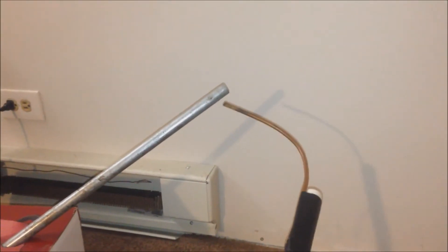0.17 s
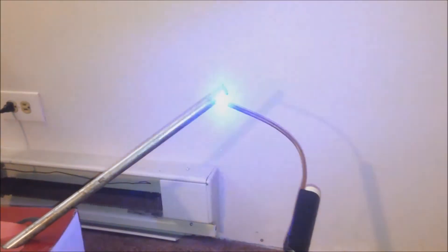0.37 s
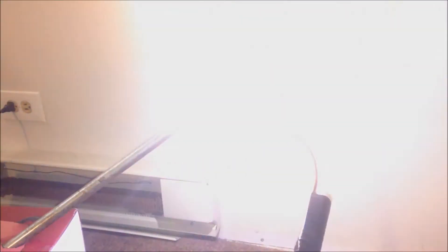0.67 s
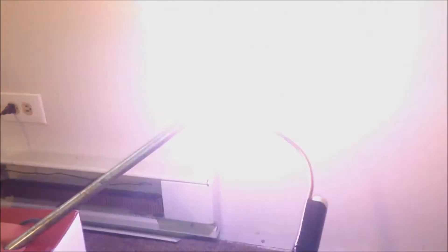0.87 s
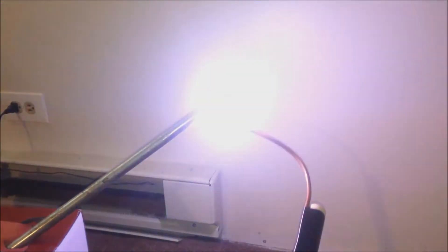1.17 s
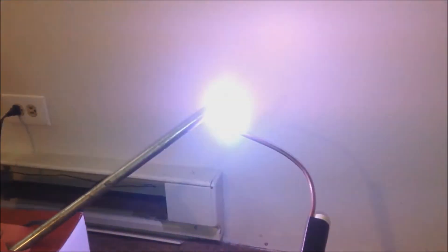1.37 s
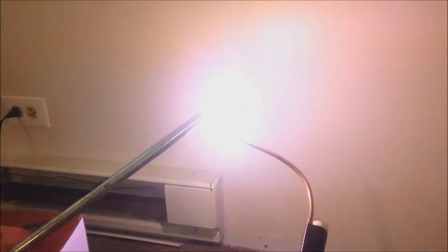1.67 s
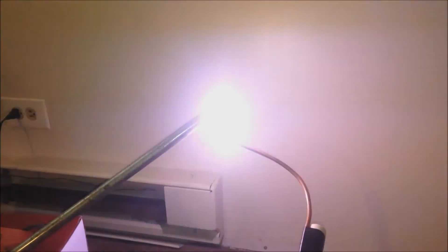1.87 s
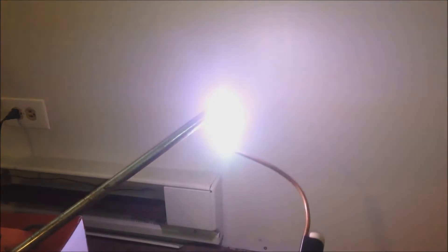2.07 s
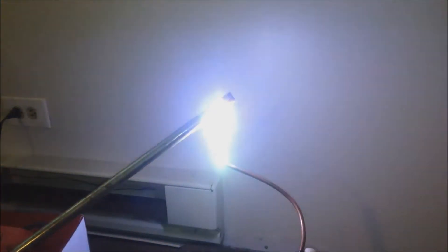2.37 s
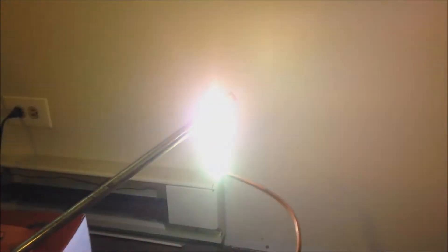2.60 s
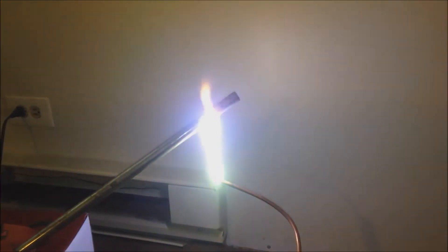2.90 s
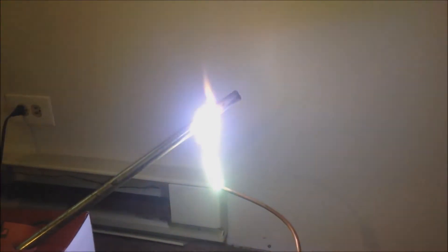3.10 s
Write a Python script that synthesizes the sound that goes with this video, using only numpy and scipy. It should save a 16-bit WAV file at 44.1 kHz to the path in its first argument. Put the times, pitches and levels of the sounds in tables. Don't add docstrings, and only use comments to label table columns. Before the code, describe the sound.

A high-voltage electric arc buzzes in a small room. Quiet room air and a faint chirping whirr come first; at 0.37 s a rod ticks against wire with a short dull ring. From 0.44 s sparks sizzle, then at about 0.74 s a low thump brings a loud, raspy 120-per-second buzz. Sharp snaps cluster until 2.3 s, with more near 2.7; buzz, hiss and hum thicken until the abrupt end around 3.2 s.

```python
import sys
import numpy as np
from scipy import signal
from scipy.fft import rfft, irfft
from scipy.io import wavfile
from scipy.ndimage import uniform_filter1d

SR = 44100
rng = np.random.default_rng(int(sys.argv[2]) if len(sys.argv) > 2 else 0)


def linear_from_db(decibels):
    return 10 ** (np.asarray(decibels, float) / 20)


def materialize(psi):
    bounded = np.clip(np.atleast_2d(psi).T, -1, 1)
    quanta = np.round(bounded * 32767).astype(np.int16)
    wavfile.write(sys.argv[1], SR, quanta)


N = 143325
t = np.arange(N) / SR
MAINS_HZ = 60
START_S, STRIKE_S = 0.44, 0.00425
CLIMB_FROM_S, CLIMB_TO_S = 1.4, 3.23
SNAP_LAG_S, SNAP_DB = 0.001, 6.5
TAP_S, BRUSH_S, LIFT_S = 0.369, 0.33, 0.398
THUMP_S, THUMP_HZ, THUMP_MS = 0.737, 116, 8

# t/s, level/dB, width/ms, unrest/dB
ARC_GROWTH = [(.44, -53, 0.048, -3), (.55, -29.5, 0.012, -21), (.66, -25.5, 0.084, -5.5),
              (.76, -18, 0.079, -14.5), (.93, -16.5, 0.082, -4), (1.0, -21, 0.097, -11.5),
              (1.45, -18.5, 0.13, -26.5), (1.57, -16.5, 0.15, -12.5), (1.7, -17, 0.18, -17.5),
              (1.8, -17, 0.16, -8.5), (1.9, -16.5, 0.17, -24.5), (2.12, -16.5, 0.17, -7),
              (2.18, -15, 0.18, -18.5), (2.28, -14, 0.21, -11.5), (2.45, -17.5, 0.2, -17.5),
              (2.72, -15, 0.19, -11), (2.85, -18, 0.21, -16.5), (3.25, -17.5, 0.23, -19)]
# t/s, extra level/dB, bite/dB
SURGES = [(0.504, 0, -0.6), (0.571, 3.5, -10), (0.687, 1.5, 1.5), (0.721, 2.9, -14), (0.754, 3, -6),
          (0.779, 4, 5.5), (0.937, -3, -1), (1.104, 5, 2), (1.196, 3.5, 11), (1.204, 4.5, 5),
          (1.271, 4, -7), (1.287, 4.5, -1), (1.304, 7, 4), (1.354, 7.5, 10), (1.371, 2.6, -4),
          (1.537, 5.5, 2), (1.637, 2, 2), (1.646, 1, 5), (1.654, 0.5, -1.5), (1.712, -0.5, 4),
          (1.762, 3.9, 2), (1.812, 0, 4.1), (1.887, 5, 2.5), (1.979, -0.5, 17), (2.004, 1.5, 9),
          (2.046, 3.5, 8.5), (2.121, 5.5, 4.7), (2.129, 1, 1), (2.137, 4, 7), (2.146, 0.5, 6),
          (2.246, -2.5, 11), (2.254, 2.3, 7.5), (2.287, 2.5, 9), (2.321, -1.2, 7.5), (2.329, 2, 4.4),
          (2.387, 0.5, 6), (2.404, 4, -1), (2.512, 0, 2.5), (2.546, -2, 2.5), (2.562, -3.5, 4.5),
          (2.612, -2, 1), (2.629, 1.5, 7), (2.662, 2, -2), (2.771, -4, 7), (2.812, 1, -0.5),
          (2.887, 3.1, -0.5), (2.921, 1.5, -1), (2.937, -0.2, 7.7), (2.962, -1, 2), (3.037, 3.7, 5),
          (3.046, 2.5, 4), (3.054, 3.5, 2), (3.112, 0.5, 4), (3.121, 3.3, 3), (3.196, 1, 2),
          (3.204, 4.3, -0.5)]
# t/s, delay/ms, gain/1
WALL_ECHO = [
    (.44, 1.51, 0.29),
    (1.3, 1.596, 0.32),
    (1.9, 1.65, 0.36),
    (2.45, 1.67, 0.68),
    (3.0, 1.7, 0.83),
]
# f/Hz, width/Hz, gain arc low/1, gain arc high/1
STRIKE_BANDS = [(480, 100, -0.07, 0.32), (597, 81, 0.04, 0.45), (737, 90, -0.27, 0.43),
                (828, 85, -0.24, -0.53), (970, 80, .35, 0.046), (1220, 100, 0.61, 0.15),
                (1307, 120, 0.33, -0.57), (1565, 300, -0.39, -0.51), (1766, 145, 0.19, 0.93),
                (2050, 300, 0.02, -0.44)]
# t/s, peak level/dB, width/ms
SNAPS = [(0.703, -24.5, 0.057), (0.7691, -22.5, 0.063), (0.7868, -23.5, 0.036), (0.8191, -20, 0.025),
         (0.8371, -17.5, 0.016), (0.8689, -23, 0.062), (0.8865, -18, 0.025), (0.9033, -22.5, 0.062),
         (0.92, -23.5, 0.05), (0.9525, -22, 0.019), (0.97, -21, 0.058), (1.0865, -24.5, 0.068),
         (1.1867, -27, 0.034), (1.3368, -16.5, 0.043), (1.4045, -19, 0.031), (1.5035, -23, 0.097),
         (1.5534, -19, 0.073), (1.5868, -23, 0.075), (1.7534, -21.5, 0.091), (1.7707, -19, 0.045),
         (1.8033, -16, 0.044), (1.9702, -11.5, 0.026), (2.0203, -18, 0.041), (2.0368, -18, 0.066),
         (2.0713, -23, 0.064), (2.0873, -19.5, 0.04), (2.1034, -20, 0.051), (2.2703, -18, 0.044),
         (2.704, -19, 0.098), (2.7544, -13, 0.078)]
# t/s, level/dB
SIZZLE_LEVEL = [
    (0.42, -66),
    (0.476, -47.5),
    (0.528, -40),
    (0.732, -62.5),
    (0.738, -42),
    (0.75, -53),
    (0.894, -55),
    (1.1, -65),
]
# f/Hz, level per Hz/dB
SIZZLE_COLOUR = [(180, -36), (300, 2), (484, -8.5), (2100, -4.5), (2560, -37), (3230, -12), (15500, -1.5)]
# delay/ms, gain/1
REPEATS = [(2.7, -0.18), (3.35, 0.11), (4.9, -0.12), (6.0, 0.14), (7.9, -0.059)]
# f/Hz, width/Hz, gain/1
MICROPHONE = [(129, 40, 0.00061), (291.6, 620, -0.68), (590, 650, 0.32), (999, 170, 0.93),
              (1276, 310, 0.11), (1520, 300, 0.5), (1990, 470, 1), (2507, 790, -0.89), (3320, 194, 0.86)]
# f/Hz, level/dB, T60/s
ROD_MODES = [(107, -10, 0.3), (276, -7, 0.22), (344, -5.5, 0.15), (555, 1, 0.13), (915, -12, 0.064),
             (2500, -19.5, 0.061), (5330, -16, 0.044), (9850, -23, 0.14), (10400, -28.5, .1)]
# multiple of mains/1, level over the load/dB, phase/turns
HUM_PARTIALS = [(2, 1.9, 0.055), (3, -24.5, 0.23)]
# t/s, level/dB
CORE_LOAD = [
    (0.44, -64),
    (0.74, -43),
    (1.23, -44),
    (1.29, -40),
    (2.21, -36),
    (3.23, -33.5),
    (3.25, -31),
]
# f/Hz, level per Hz/dB
AIR_COLOUR = [(25, -28), (59, 0), (95, -16), (150, -14.5), (520, -13.5), (1050, -17), (2000, -29),
              (15500, -50)]
# f/Hz, level per Hz/dB
HISS_COLOUR = [(2500, 14), (3200, 10), (5600, 0), (10000, 0), (15500, 6)]


def arc():
    half_cycle = np.arange(int(START_S * 2 * MAINS_HZ), int(N / SR * 2 * MAINS_HZ))
    s = half_cycle / (2 * MAINS_HZ) + STRIKE_S
    odd = half_cycle % 2 == 1
    wander, flicker = rng.standard_normal((2, len(s)))
    at, extra_db, bite_db = np.array(SURGES).T
    struck = (at * 2 * MAINS_HZ).astype(int) - half_cycle[0]
    extra_db = np.bincount(struck, extra_db, len(s))
    bite_db = np.bincount(struck, bite_db, len(s))
    db = curve(ARC_GROWTH, 1, s) + extra_db
    width_ms = curve(ARC_GROWTH, 2, s) * linear_from_db(-0.33 * bite_db)
    unrest = curve(ARC_GROWTH, 3, s)
    outburst = np.minimum(rng.exponential(size=len(s)), 1.5)
    crackle_db = db + unrest + 5.6 * outburst - 1.2 * odd + 0.9 * bite_db

    even = even_strikes(s, odd, db, width_ms, wander)
    rough = crackle(s, crackle_db, width_ms, wander, flicker) + snaps()
    rough = rough + fizz(s, crackle_db) + roar(s, db, unrest, flicker)
    in_room = room(even, tail_db=-18.5) + room(rough, tail_db=-12)
    return in_room, sizzle(s, odd, wander) + snap_cracks()


def even_strikes(s, odd, db, width_ms, wander):
    jitter_s = 0.022 / 1000 * rng.standard_normal(len(s))
    scatter_db = 0.7 * rng.standard_normal(len(s))
    drift_db = 1.97 * uniform_filter1d(wander, size=5)
    level_db = db + scatter_db + drift_db + 1.18 * odd
    width_ms = width_ms * np.exp(0.06 * rng.standard_normal(len(s)))
    wall_gain = curve(WALL_ECHO, 2, s)[:, None]
    x = dips(s + jitter_s, level_db, width_ms, curve(WALL_ECHO, 1, s), wall_gain)
    height = climb(t)
    return x + sum((low + (high - low) * height) * band(x, hz, w) for hz, w, low, high in STRIKE_BANDS)


def crackle(s, level_db, width_ms, wander, flicker):
    late_s = 0.00026 + 0.000331 * wander
    return dips(s + late_s, level_db, 0.57 * width_ms * np.exp(0.16 * flicker))


def snaps():
    when, peak_db, ms = np.array(SNAPS).T
    sharp = dips(when + SNAP_LAG_S, peak_db + SNAP_DB, ms)
    return sharp + dips(when + SNAP_LAG_S, peak_db + SNAP_DB - 11.5, np.full(len(ms), 0.044))


def fizz(s, crackle_db):
    when, peak_db, _ = np.array(SNAPS).T
    levels_db = np.r_[peak_db + SNAP_DB, crackle_db] - 25
    return puffs(np.r_[when, s], levels_db, ms=0.77) * rng.standard_normal(N)


def roar(s, db, unrest, flicker):
    level_db = db - 26 - 6.5 * climb(s) + 0.39 * unrest + 3 * flicker
    colour = [(250, -25), (500, 0), (1510, 0), (5000, -18), (15500, -36)]
    return puffs(s, level_db, ms=3.4) * noise(colour)


def sizzle(s, odd, wander):
    end_s = SIZZLE_LEVEL[-1][0]
    early = s < end_s
    burst_db = curve(SIZZLE_LEVEL, 1, s) + 5 - 14 * odd + 3.7 * wander
    bursts = puffs(s[early], burst_db[early], ms=1.8)
    bed = linear_from_db(curve(SIZZLE_LEVEL, 1, t) - 6.5) * (t > START_S) * (t < end_s)
    return (bursts + bed) * noise(SIZZLE_COLOUR)


def snap_cracks():
    when, peak_db, ms = np.array(SNAPS).T
    edges = puffs(when + SNAP_LAG_S, peak_db - 16 - 150 * ms, ms=0.23)
    return edges * noise([(3000, -25), (9000, -8), (15500, 6)])


def climb(s):
    return np.clip((s - CLIMB_FROM_S) / (CLIMB_TO_S - CLIMB_FROM_S), 0, 1)


def dips(times, db, width_ms, wall_ms=1.553, wall_gain=0.7):
    w = np.clip(width_ms, 0.02, 0.4)[:, None] / 1000

    def dip(s):
        return -linear_from_db(db)[:, None] * (s / w / 2) ** 3 * np.exp(3 - 1.5 * s / w)

    direct = place(times, dip, size=160)
    return direct + place(times + wall_ms / 1000, lambda s: wall_gain * dip(s), size=160)


def room(x, tail_db):
    near = x + sum(g * np.interp(t - ms / 1000, t, x, left=0) for ms, g in REPEATS)
    s = t[:SR // 3]
    tail = rng.standard_normal(len(s)) * linear_from_db(-60 * s / 0.3)
    tail = tail * np.clip(s / 0.016, 0, 1)
    tail = signal.lfilter(*signal.butter(1, [400, 4830], "band", fs=SR), tail)
    tail = tail / np.sqrt(np.sum(tail ** 2))
    return near + linear_from_db(tail_db) * signal.fftconvolve(x, tail)[:N]


def microphone(x):
    x = signal.sosfilt(signal.butter(2, 121, "high", fs=SR, output="sos"), x)
    x = signal.lfilter(*signal.butter(1, 6200, fs=SR), x)
    return x + sum(g * band(x, hz, w) for hz, w, g in MICROPHONE)


def tap():
    s = np.maximum(t - TAP_S, 0)
    ring = sum(linear_from_db(db - 60 * s / t60) * np.sin(2 * np.pi * hz * s) for hz, db, t60 in ROD_MODES)
    ring = ring * (1 - np.exp(-s / 0.0065))
    ring = ring * linear_from_db(-4 * np.clip((t - LIFT_S) / 0.004, 0, 1))
    tick_fade = np.exp(-s / 0.0028) + 0.21 * np.exp(-s / 0.028)
    tick = (t > TAP_S) * tick_fade * noise([(1000, 2.5), (7000, -3), (11000, -10), (15500, -8)])
    brush_fade = (t > BRUSH_S) * np.exp(-np.maximum(t - BRUSH_S, 0) / 0.002)
    brush = brush_fade * noise([(2000, -10), (8000, -6), (15500, -6)])
    return linear_from_db(-31) * ring + linear_from_db(-37) * (tick + linear_from_db(-17) * brush)


def hum():
    load = linear_from_db(curve(CORE_LOAD, 1, t)) * (t > START_S) * np.sqrt(2)
    core = sum(linear_from_db(db) * np.sin(2 * np.pi * (m * MAINS_HZ * t + turns)) for m, db, turns in HUM_PARTIALS)
    thump = puffs(np.array([THUMP_S]), np.array([-34.5]), THUMP_MS / 2)
    thump = thump * np.cos(2 * np.pi * THUMP_HZ * (t - THUMP_S - THUMP_MS / 1000))
    waver = 1 + 0.65 * noise([(1, -2), (15, -8), (40, -7)])
    idle = linear_from_db(-64) * waver * np.sin(2 * np.pi * MAINS_HZ * t)
    return thump + load * core + idle


def air():
    beats = np.arange(0.028, N / SR, 1 / 23.8)
    chirp = puffs(beats, -71 + 3.1 * rng.standard_normal(len(beats)), ms=4)
    chirp = chirp * noise([(6200 * 0.8, -25), (6200, 0), (6200 * 1.06, -25)])
    hiss = noise([(600, -46.5), *HISS_COLOUR]) * np.clip((t - START_S) / 0.14, 0, 1)
    return linear_from_db(-58.5) * noise(AIR_COLOUR) + chirp + linear_from_db(-53.5) * hiss


def curve(table, col, s):
    points = np.array(table)
    return np.interp(s, points[:, 0], points[:, col])


def noise(colour):
    hz, db = np.array(colour).T
    f = np.maximum(np.arange(N // 2 + 1) * SR / N, 1)
    gain = linear_from_db(np.interp(np.log(f), np.log(hz), db))
    x = irfft(rfft(rng.standard_normal(N)) * gain, N)
    return x / x.std()


def band(x, hz, width):
    return signal.lfilter(*signal.iirpeak(hz, hz / width, fs=SR), x)


def place(times, shape, size):
    at = (times * SR).astype(int)[:, None] + np.arange(size)
    pulses = shape(np.maximum(at / SR - times[:, None], 0))
    return np.bincount(at.ravel(), pulses.ravel(), N + size)[:N]


def puffs(times, db, ms):
    return place(times, lambda s: linear_from_db(db)[:, None] * s * 1000 / ms * np.exp(1 - s * 1000 / ms), size=640)


def scene():
    strikes, bright = arc()
    return (microphone(strikes) + bright + tap() + hum() + air())[None]


def low_pass(x):
    return signal.sosfilt(signal.butter(12, 16520, fs=SR, output="sos"), x)


def record(dry):
    mix = signal.sosfilt(signal.ellip(6, 0.2, 24, 15400, fs=SR, output="sos"), dry)
    return low_pass(mix)


dry = scene()
out = record(dry)
materialize(out)
```